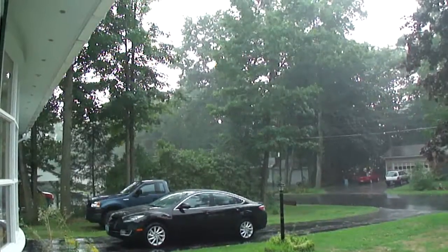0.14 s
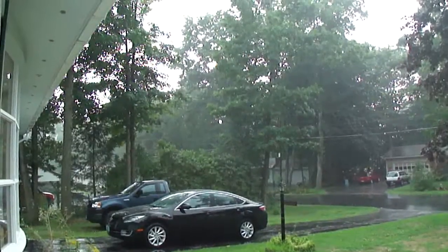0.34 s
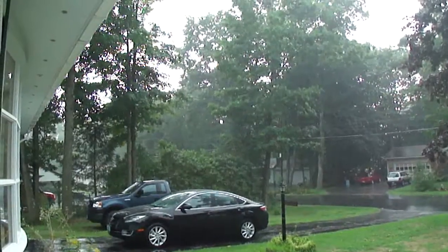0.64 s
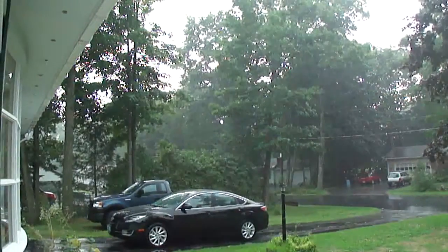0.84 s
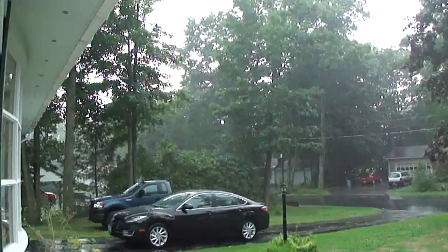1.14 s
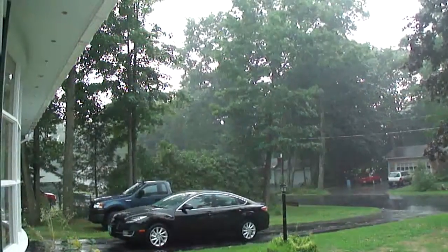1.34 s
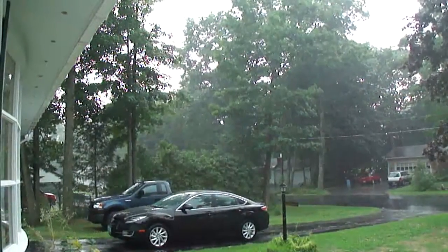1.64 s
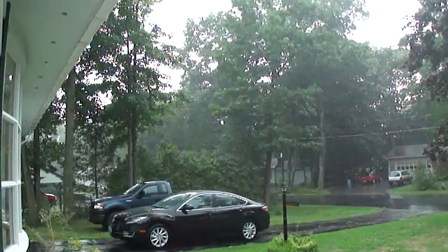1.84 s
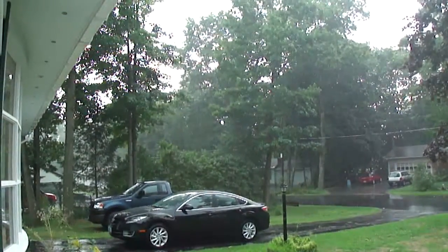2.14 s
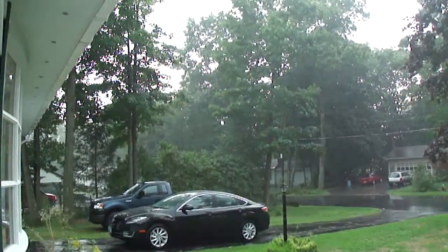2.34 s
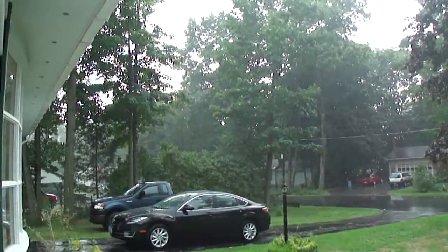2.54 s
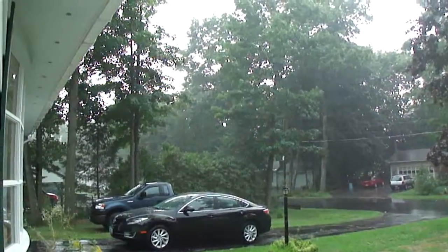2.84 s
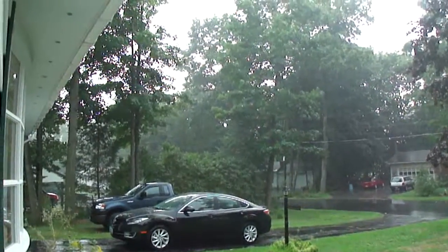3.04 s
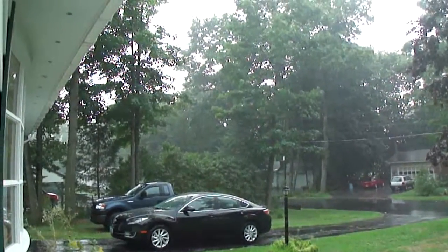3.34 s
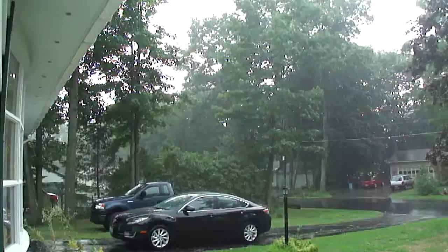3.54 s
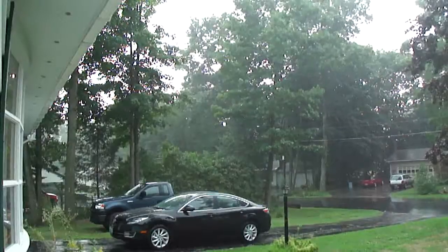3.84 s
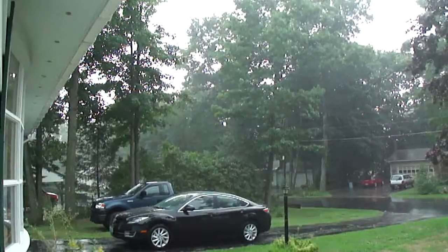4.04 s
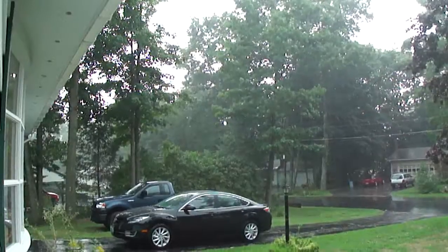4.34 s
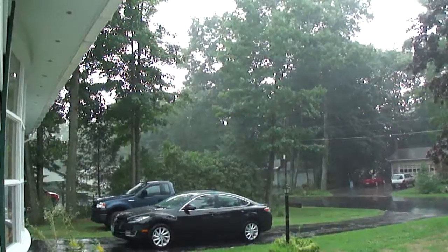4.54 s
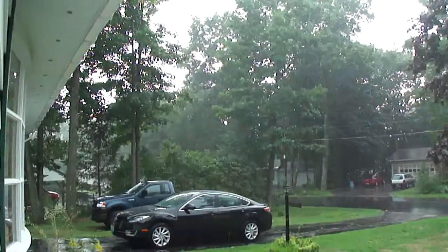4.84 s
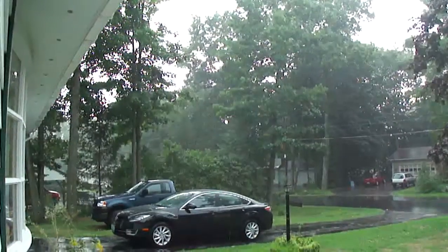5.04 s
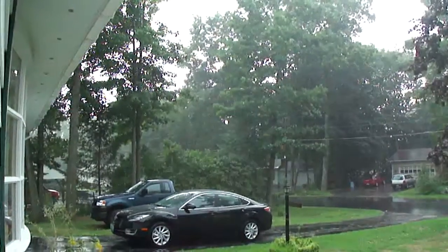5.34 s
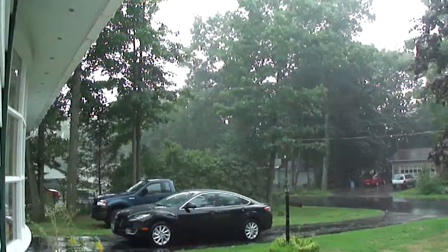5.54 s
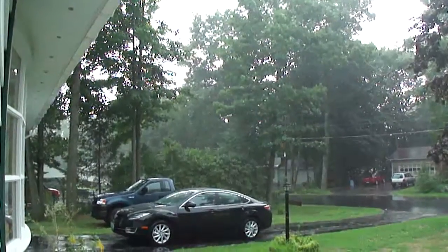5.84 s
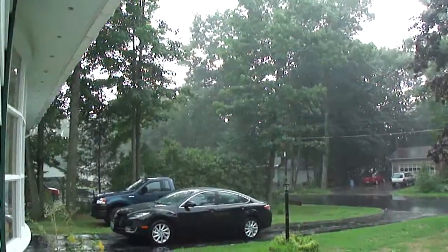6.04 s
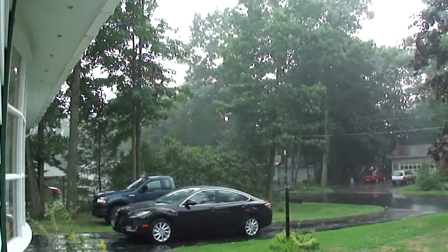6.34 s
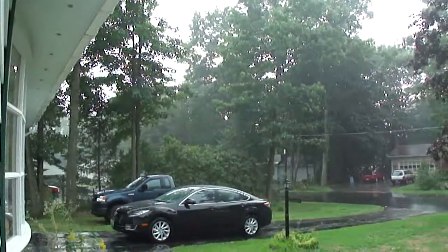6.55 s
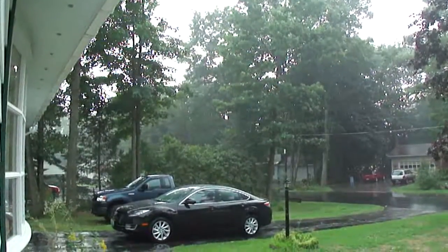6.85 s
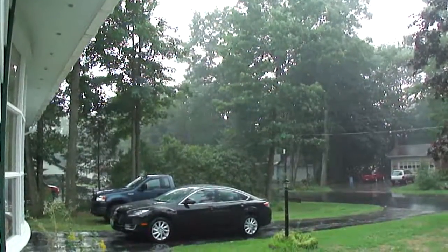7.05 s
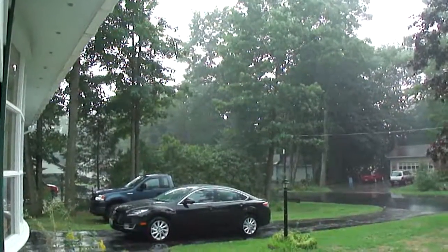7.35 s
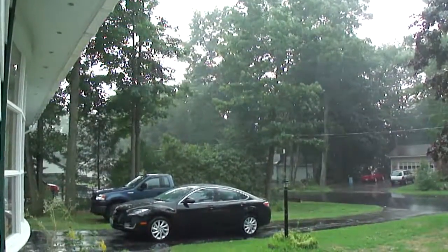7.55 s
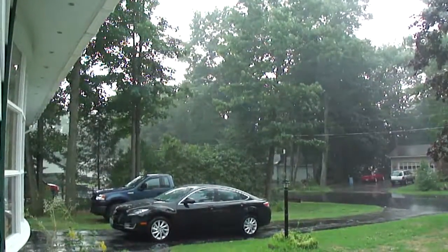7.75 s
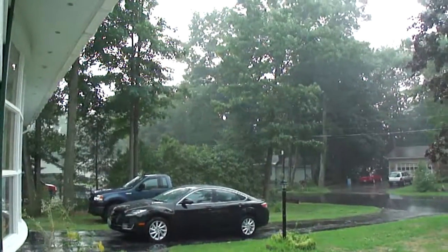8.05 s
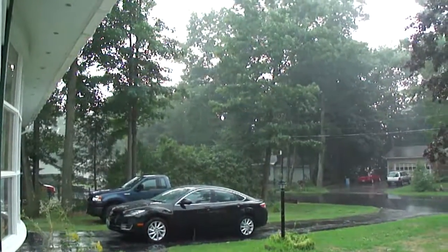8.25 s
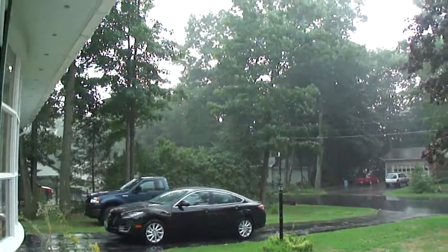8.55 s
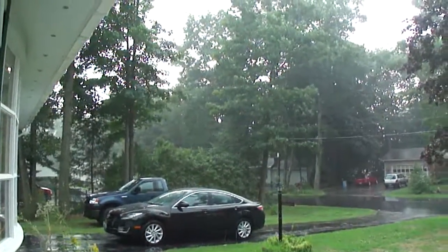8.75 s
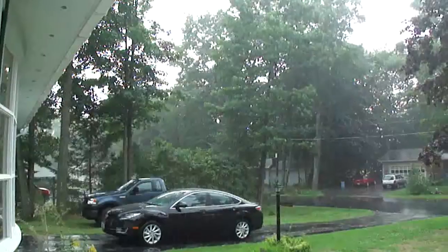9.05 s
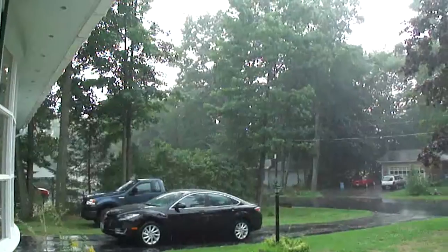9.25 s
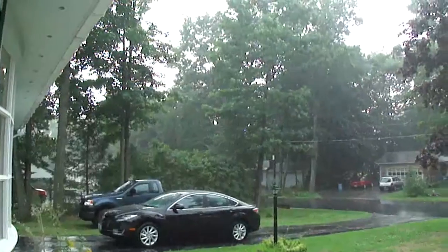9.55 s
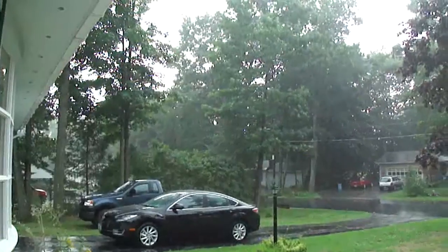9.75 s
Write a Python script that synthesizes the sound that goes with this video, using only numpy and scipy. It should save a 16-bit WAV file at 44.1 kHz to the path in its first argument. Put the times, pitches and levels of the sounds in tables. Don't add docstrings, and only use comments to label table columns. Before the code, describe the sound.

A continuous downpour outdoors under a porch roof. Close, sharp drips click, tick and plop on wet ground, each doubled by quick reflections from floor and wall, over a soft broad rush of far rain. A dying thunder peal rumbles very low beneath at first; the middle is calmer, one big hollow drop lands at about seven seconds, then rain and thunder rise again. The handheld microphone briefly dips at bright splashes.

```python
import sys
import numpy as np
from scipy import signal
from scipy.fft import rfft, irfft, next_fast_len
from scipy.io import wavfile
from scipy.ndimage import uniform_filter1d

SR = 44100
rng = np.random.default_rng(int(sys.argv[2]) if len(sys.argv) > 2 else 0)


def ratio(d):
    e = np.asarray(d, float) / 20
    return 10 ** e


def unload_audio(sound):
    columns = np.transpose(np.atleast_2d(sound))
    steps = np.round(np.clip(columns, -1, 1) * 32767)
    wavfile.write(sys.argv[1], SR, steps.astype(np.int16))


N = 436149

# start_s, spray_strength_db
RAIN_STRENGTH = [
    (0, -48),
    (1.8, -49),
    (6.44, -49),
    (8.4, -44.5),
    (9.0, -44),
    (9.2, -44),
    (9.4, -45.5),
    (9.89, -42.5),
]
# start_s, rumble_db
THUNDER_LEVEL = [
    (0, -43),
    (1.1, -46),
    (2.4, -49),
    (6.5, -48.5),
    (8.1, -46.5),
    (8.8, -44),
    (9.3, -47),
    (9.89, -44.5),
]
# pitch_hz, density_db_per_hz
ROAR_SPECTRUM = [(150, -53), (250, -8), (334, -16), (370, -7.5), (509, -5), (605, -3.5), (742, 0),
                 (949, -4.5), (1160, 0), (1400, -4), (1580, -0.5), (1820, -5), (2330, -3.5), (3710, -7),
                 (8000, -25), (10400, -38), (17600, -120)]
# pitch_hz, density_db_per_hz
FIZZ_SPECTRUM = [(2940, -9), (5000, 2), (5540, 0), (8760, -11), (10800, -16.5), (14000, -70), (22000, -120)]
# pitch_hz, density_db_per_hz
RUMBLE_SPECTRUM = [(15, -57), (25, -24), (102, -11), (226, -2), (330, -0.5), (430, -18), (730, -120)]
# start_s, level_db, pitch_hz, splash_db
FAT_DROPS = [(0.1183, -18.5, 4130, -46), (1.0015, -23.5, 4400, -42), (1.397, -20, 3220, -37),
             (1.945, -21, 3030, -36.5), (2.1252, -28.5, 3160, -36.5), (2.215, -21.5, 4000, -39),
             (2.2914, -22, 3000, -44), (2.3302, -25, 4650, -38), (2.374, -27, 4300, -46),
             (2.4445, -31, 5200, -38), (3.15, -23.5, 3460, -41), (4.2436, -37, 5600, -41),
             (4.9265, -34, 5800, -52), (5.085, -28.5, 4430, -50), (5.736, -28.5, 2980, -43),
             (5.9738, -32, 4700, -52), (7.258, -27, 2830, -43), (7.8752, -28.5, 4000, -52),
             (8.1246, -28, 4400, -45), (8.543, -24, 4500, -44), (9.83, -27, 4330, -52),
             (9.887, -23, 3200, -52)]
# start_s, level_db, pitch_hz, splash_db
LIGHT_DROPS = [(0.05, -37, 6100, -43), (0.0811, -38, 6310, -49), (0.237, -29, 4800, -48),
               (0.8338, -39, 5700, -38), (1.0632, -34, 4820, -49), (2.5906, -39, 7140, -53),
               (2.642, -40, 7060, -45), (2.8777, -28.5, 4260, -44.5), (3.1217, -23, 3440, -49),
               (3.3667, -37, 6140, -46), (3.843, -33, 5070, -50), (3.8852, -34, 4840, -52),
               (3.9684, -36, 6670, -50), (4.965, -31.5, 4290, -47), (6.2585, -31, 3010, -56),
               (7.54, -34, 5900, -46.5), (7.681, -40, 4180, -47), (8.494, -38, 4030, -40),
               (8.5854, -26.5, 3420, -43), (8.8913, -28, 4740, -51.5), (9.203, -38, 4400, -38),
               (9.2474, -30, 4820, -42), (9.3664, -27.5, 5700, -42), (9.4157, -33, 5000, -54),
               (9.543, -27, 4740, -40), (9.8584, -38, 3880, -44)]
# start_s, level_db, pitch_hz
PUDDLE_PLOPS = [
    (0.2, -32, 1200),
    (3.158, -34, 1250),
    (0.2975, -33, 1230),
    (1.699, -31, 1250),
    (3.9684, -32, 1230),
    (5.327, -33, 1530),
    (7.54, -31, 2260),
    (8.027, -28, 1140),
    (9.1768, -32, 1160),
    (9.7795, -31, 1160),
]
# start_s, splash_db
SPRAY_TICKS = [(0.1604, -48), (0.3802, -49), (0.4666, -50), (0.768, -46), (0.8116, -48), (1.699, -43),
               (2.3913, -43), (2.957, -46), (3.7963, -49), (4.2689, -47), (4.4726, -51), (4.754, -46),
               (4.7805, -46), (5.0324, -52), (5.6799, -45), (7.4201, -49), (7.7053, -49), (8.0393, -47),
               (8.3004, -45), (9.1575, -43), (9.2765, -42), (9.424, -48), (9.7795, -46)]
# pitch_hz, level_db
LARGEST_DROP_TONES = [
    ((1700, -22.5), (2140, -11.5)),
    ((1150, -28), (3000, -26)),
]
# delay_ms, level_db, tilt_db_per_octave
ECHO_PATHS = [
    (0, -1, -7),
    (2.15, -1.5, -6),
    (3.3, -13, 0),
    (4.6, -5, 0),
    (5.55, -1.5, 0),
    (6.4, -4, 0),
    (7.2, -7, 1),
    (8.4, -10, 2),
]
# pitch_hz, t60_s
PORCH_DECAY = [(800, 0.14), (3000, 0.052), (10000, 0.35)]
# start_s, dip_db
GAIN_DUCKS = [(.126, 6), (.475, 1.5), (.774, 5.5), (.842, 6.5), (1.403, 4.5), (2.132, 3.5), (2.398, 5),
              (2.451, 6.5), (8.55, 3.5), (9.214, 10), (9.254, 7)]

SILENT_DB = -90


def unit(x):
    return x / np.sqrt(np.mean(x ** 2) + 1e-20)


def along(points, hz):
    point_hz, value = np.transpose(points)
    return np.interp(np.log(hz + 1), np.log(point_hz + 1), value)


def over_time(rows):
    start_s, level_db = np.transpose(rows)
    return np.interp(np.arange(N) / SR, start_s, level_db)


def filtered(x, response):
    size = next_fast_len(N + SR // 4)
    spectrum = rfft(x, size) * response(np.fft.rfftfreq(size, 1 / SR))
    return irfft(spectrum, size)[:N]


def rush(spectrum, patchy_db):
    z = signal.stft(rng.standard_normal(N), nperseg=512)[2]
    patches = uniform_filter1d(rng.standard_normal(z.shape), size=10, axis=0)
    patches = uniform_filter1d(patches, size=12, axis=1)
    noise = signal.istft(z * ratio(patchy_db * unit(patches)), nperseg=512)[1][:N]
    return unit(filtered(noise, lambda hz: ratio(along(spectrum, hz))))


def downpour():
    strength_db = over_time(RAIN_STRENGTH)
    swell_db = strength_db - strength_db.mean()
    roar = ratio(-31 + 0.29 * swell_db) * rush(ROAR_SPECTRUM, patchy_db=0.5)
    fizz = ratio(-46 + 1.2 * swell_db) * rush(FIZZ_SPECTRUM, patchy_db=2.0)
    return roar + fizz


def thunder():
    return ratio(over_time(THUNDER_LEVEL) + 0.15) * rush(RUMBLE_SPECTRUM, patchy_db=1.0)


def clicks(start_s, level_db, pitch_hz, cycles):
    t = np.arange(200) / SR
    hz = pitch_hz[:, None]
    turn = hz * t
    decay_cycles = cycles * np.sqrt(hz / 3500)
    envelope = turn ** 1.1 * np.exp(-turn / decay_cycles)
    tone = -np.sin(2 * np.pi * turn * (1 + .01 * turn)) * envelope
    tone *= (ratio(level_db) / np.linalg.norm(tone, axis=1))[:, None]
    at = np.round(start_s * SR).astype(int)[:, None] + np.arange(len(t))
    return np.bincount(at.ravel(), tone.ravel(), N + SR)[:N]


def smacks(start_s, low_db, low_hz, high_db, high_hz, splash_db):
    scatter_s = .0008
    out = np.zeros(N)
    for delay_ms, path_db, tilt_db in ECHO_PATHS:
        luck = rng.standard_normal((len(start_s), 9))
        arrival_s = start_s + delay_ms / 1000 + 2e-5 * delay_ms * luck[:, 0]
        coarse_hz = 5900 * np.exp(0.2 * luck[:, 1])
        fine_hz = 8300 * np.exp(0.094 * luck[:, 2])
        parts = [(low_db, low_hz, .66), (high_db, high_hz, .78),
                 (splash_db + 8.5, coarse_hz, 1.1), (splash_db - 3, fine_hz, .9)]
        for k, (db, hz, cycles) in enumerate(parts):
            shade_db = tilt_db * np.log2(np.maximum(hz / 2600, .7))
            lag_s = scatter_s * abs(luck[:, 5 + k]) if k > 1 else 0
            heard_db = db + path_db + shade_db + 0.32 * luck[:, 3 + k]
            out += clicks(arrival_s + lag_s, heard_db, hz, cycles)
    return out


def patter(count):
    where, size, pitch, step, bright = rng.random((count, 5)).T
    size_db = -3.5 * np.log(size + .03)
    low_hz = 800 * 5.5 ** pitch
    high_hz = low_hz * (1.27 + 0.51 * step)
    splash_db = size_db + 8 * bright - 53
    return smacks(where * N / SR, size_db - 31.5, low_hz, size_db - 49, high_hz, splash_db)


def eave():
    low_ratio = 0.8
    thud_hz, thud_db = 2150, -11
    largest_s, largest_splash_db = 7.113, -48
    # start_s, low_db, low_hz, high_db, high_hz, splash_db
    rows = [(s, db - 1, hz * low_ratio, db, hz, splash) for s, db, hz, splash in FAT_DROPS]
    rows += [(s, db + thud_db, thud_hz, SILENT_DB, hz, SILENT_DB) for s, db, hz, splash in FAT_DROPS]
    rows += [(s, db - 15, hz * low_ratio, db, hz, splash) for s, db, hz, splash in LIGHT_DROPS]
    rows += [(s, db, hz, db - 10, hz / low_ratio, SILENT_DB) for s, db, hz in PUDDLE_PLOPS]
    rows += [(s, splash - 3, 4200, splash + 0.7, 6500, splash) for s, splash in SPRAY_TICKS]
    rows += [(largest_s, low[1], low[0], high[1], high[0], largest_splash_db)
             for low, high in LARGEST_DROP_TONES]
    delay_ms, path_db, _ = np.transpose(ECHO_PATHS)
    ping_hz = np.full(len(delay_ms), 4340)
    ping = clicks(largest_s + delay_ms / 1000, -23.5 + path_db, ping_hz, cycles=2.6)
    drops = smacks(*np.transpose(rows)) + ping
    return ratio(18) * filtered(drops, lambda hz: (1j * hz / (1j * hz + 500)) ** 2)


def porch(x):
    hz, t, z = signal.stft(rng.standard_normal(SR // 4), SR, nperseg=128)
    slow_decay = ratio(-60 * t / along(PORCH_DECAY, hz)[:, None])
    fast_decay = ratio(-6 - 60 * t / 0.048)
    tail = signal.istft(z * (slow_decay + fast_decay), SR, nperseg=128)[1]
    wet = signal.fftconvolve(np.pad(x, (120, 0)), tail / np.linalg.norm(tail))[:N]
    slap = filtered(x, lambda hz: np.exp(-2j * np.pi * hz * .014))
    return ratio(-6) * wet + ratio(-13) * slap


def scene():
    near = eave() + patter(count=1300)
    return (near + porch(near) + downpour() + thunder())[None]


def roll_off(x):
    return signal.sosfilt(signal.butter(12, 13500, fs=SR, output="sos"), x)


def record(dry):
    t = np.arange(N) / SR
    attack_s, release_s = 0.0022, 0.027
    dip_db = np.zeros(N)
    for start_s, depth_db in GAIN_DUCKS:
        since_s = np.maximum(t - start_s, 0)
        dip_db += depth_db * (1 - np.exp(-since_s / attack_s)) * np.exp(-since_s / release_s)
    ducked = dry[0] * ratio(-dip_db)
    heard = filtered(ducked, lambda hz: (1j * hz / (1j * hz + 55)) ** 2 * (hz < 11030))
    mirrored = heard * np.cos(np.pi * np.arange(N))
    image = filtered(mirrored, lambda hz: abs(hz - 13100) < 220)
    return roll_off((heard + ratio(-34) * image)[None])


dry = scene()
out = record(dry)
unload_audio(out)
```